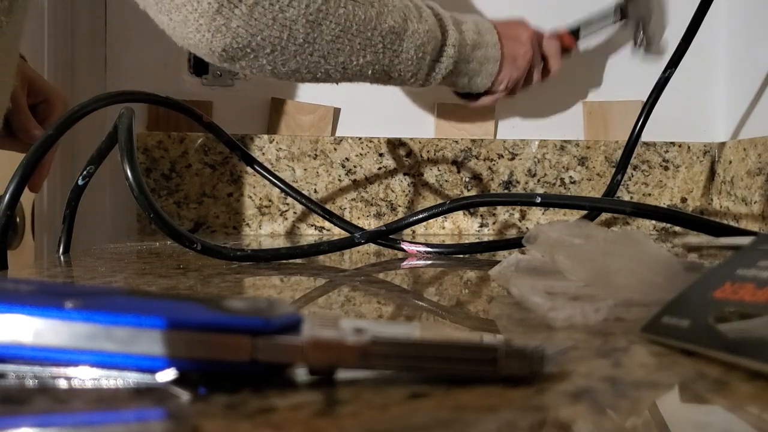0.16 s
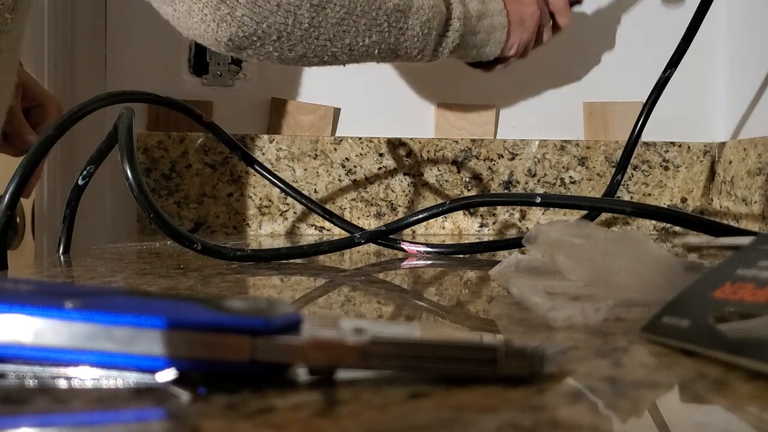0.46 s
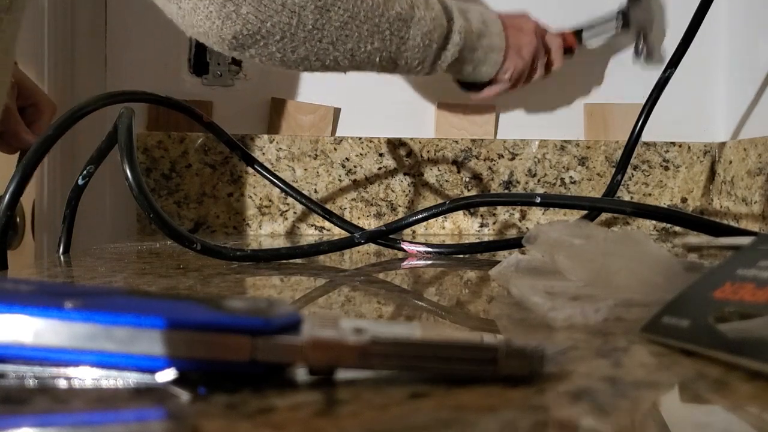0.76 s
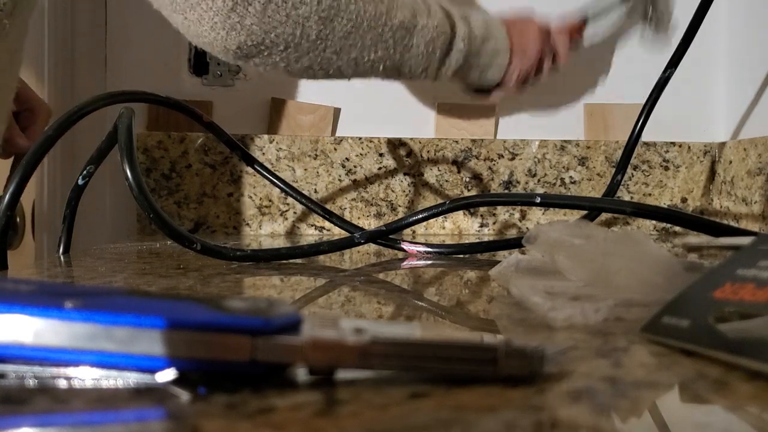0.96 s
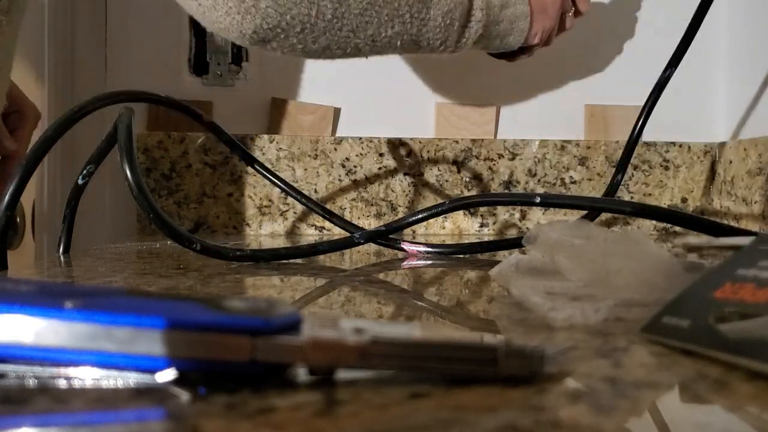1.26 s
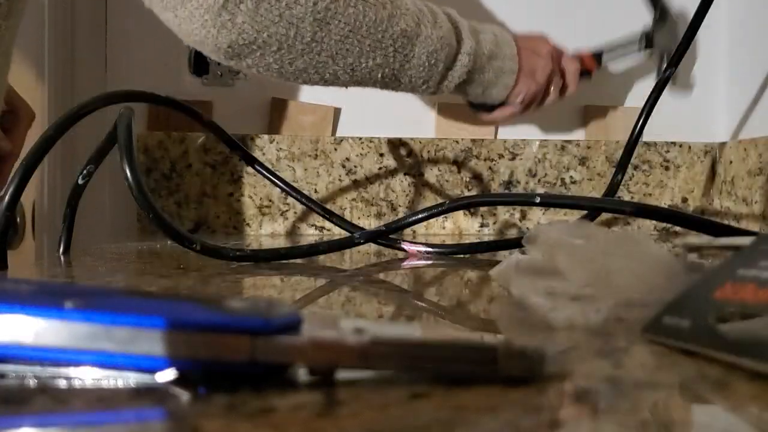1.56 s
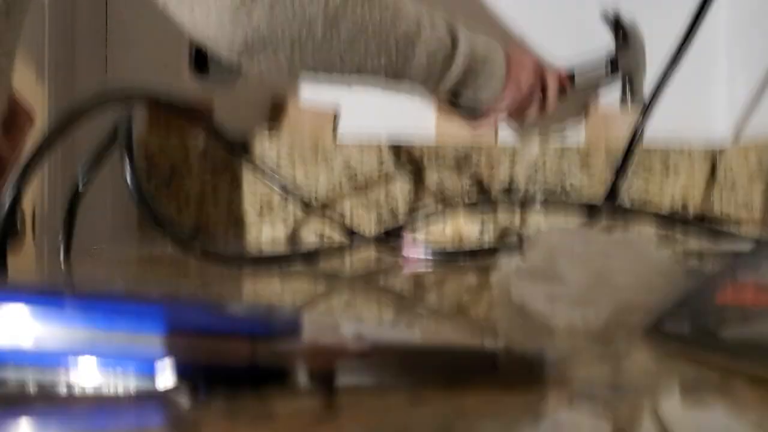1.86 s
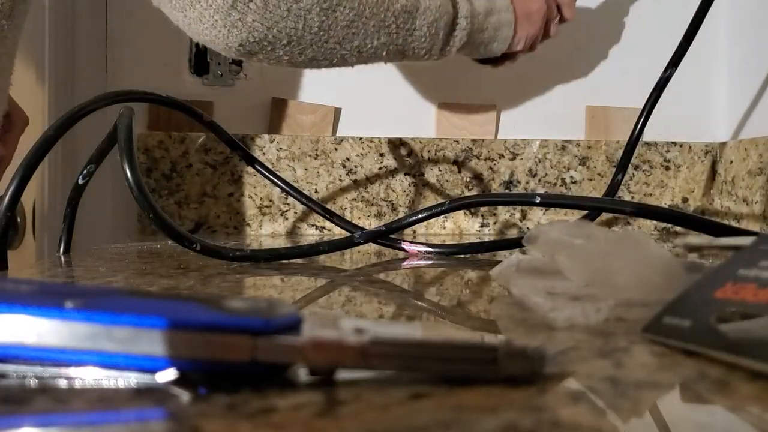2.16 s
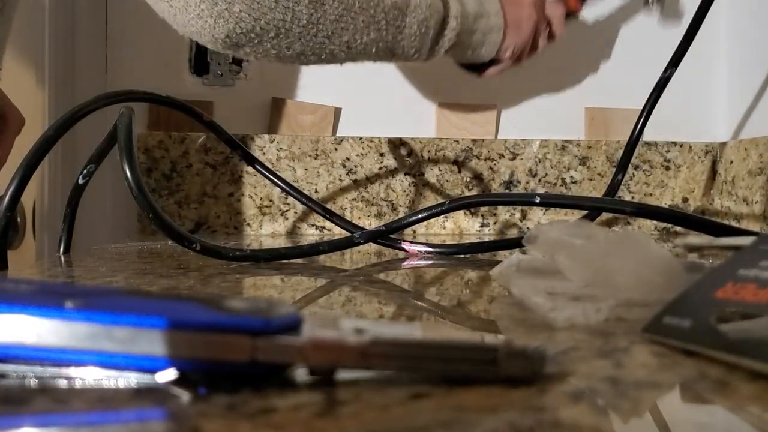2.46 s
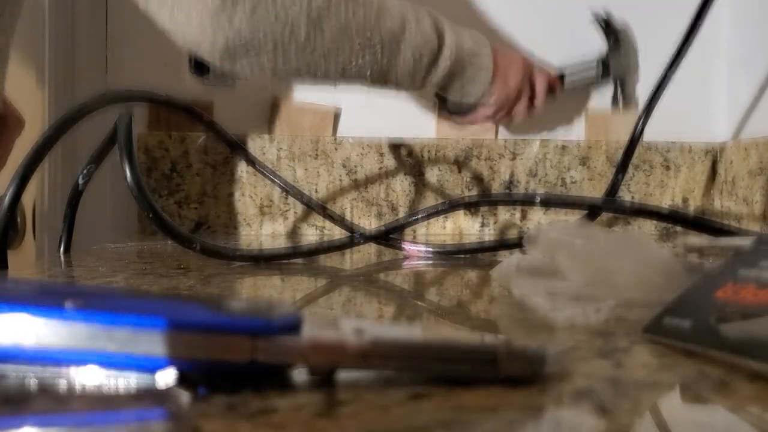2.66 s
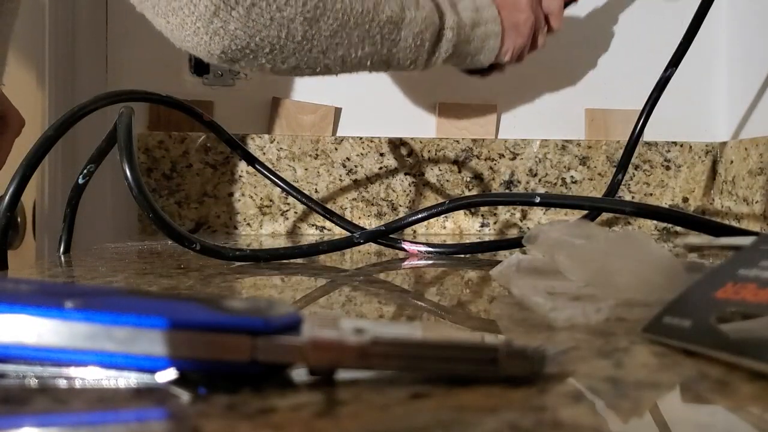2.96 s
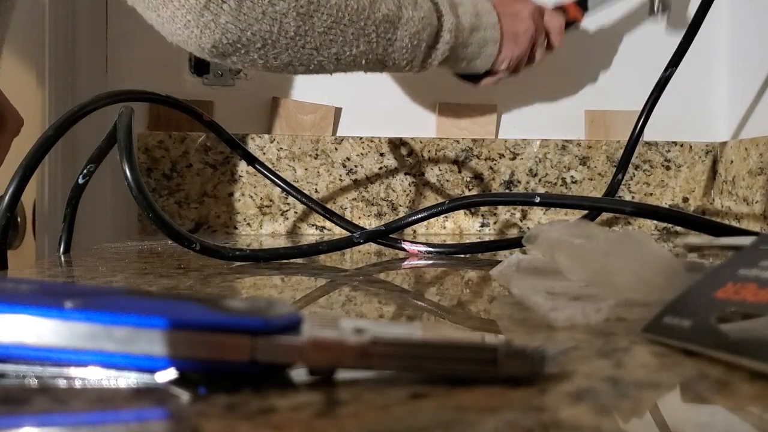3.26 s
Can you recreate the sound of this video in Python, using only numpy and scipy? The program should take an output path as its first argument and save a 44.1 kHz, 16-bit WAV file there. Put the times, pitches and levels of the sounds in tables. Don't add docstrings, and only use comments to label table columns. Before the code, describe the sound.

A hammer drives a wooden wedge behind a stone slab: a previous blow's ring fades, then eight sharp knocks follow steadily, heard close by a phone on the counter in a bare, hard room.

```python
import sys
import numpy as np
from scipy import signal
from scipy.fft import rfft, irfft
from scipy.io import wavfile

SR = 44100
rng = np.random.default_rng(int(sys.argv[2]) if len(sys.argv) > 2 else 0)


def dump(signal):
    limited = np.clip(np.atleast_2d(signal).T, -1, 1)
    pcm = np.round(limited * 32767).astype(np.int16)
    wavfile.write(sys.argv[1], SR, pcm)


def invert_db(level):
    return 10 ** (np.asarray(level, dtype=float) / 20)


N = 149940
LEAD_S = 0.5
LEFT_DB = -1.26


def conv(x, y):
    return signal.fftconvolve(np.atleast_2d(x), np.atleast_2d(y), axes=1)[:, :x.shape[-1]]


def on_log(table, hz):
    points = np.array(table)
    return np.interp(np.log(hz), np.log(points[:, 0]), points[:, 1])


def die_away(t, t60):
    return np.exp(-np.log(1000) * t / t60)


def ring(modes, t):
    return -sum(invert_db(db) * np.sin(2 * np.pi * hz * t) * die_away(t, max(t60, 1e-3)) for hz, db, t60 in modes)


def late(x, s):
    n = x.shape[-1]
    turn = np.exp(-2j * np.pi * np.fft.rfftfreq(n, 1 / SR) * s)
    return irfft(rfft(x) * turn, n)


def band(x, hz, kind):
    return signal.sosfilt(signal.butter(2, hz, kind, fs=SR, output="sos"), x)


ZONE_EDGES = [1450, 4500, 10800]


def zone(hz):
    return int(np.searchsorted(ZONE_EDGES, hz))


# t/s, level/dB, then crack, steel and sizzle against that level/dB
BLOWS = [
    (-.137, 4, -16.5, -25.5, -46),
    (0.2588, -0.5, -15.5, -25, -49),
    (0.6594, -1, -14.5, -25, -47),
    (1.052, -1, -14.5, -30.5, -47),
    (1.44, 0.5, -18.5, -35, -45),
    (1.9033, 0, -15.5, -32, -43.5),
    (2.3178, -0.5, -15.5, -31, -35.5),
    (2.7117, 1.5, -18, -32, -43.5),
    (3.0996, 1.07, -17, -31, -46.5),
]
USUAL_ZONE_DB = np.array([0, -16, -31, -45])


def blows(size):
    push, cracks, ticks = np.zeros(size), np.zeros((2, size)), np.zeros((4, size))
    t = np.arange(1500) / SR
    for s, db, *bright_db in BLOWS:
        zone_db = np.append(0, bright_db) - USUAL_ZONE_DB
        at = int((s + LEAD_S) * SR)
        here = slice(at, at + len(t))
        push_s = 0.00008 * invert_db(0.5 * rng.standard_normal())
        shape = t * np.exp(-t / push_s)
        push[here] += invert_db(db) * shape / shape.sum()
        cracks[:, here] += invert_db(db) * (crack(zone_db, t) + steel(zone_db, t))
        ticks[:, at] += invert_db(db) * invert_db(zone_db)
    return push, cracks, ticks


# f/Hz, level/dB, t60/s
KNOCK = [(106, -20.5, 0.064), (185.6, -6, 0.048), (270, 3.5, 0.012), (518.5, -10, 0.014),
         (1107, 1.5, 0.015), (2887, -1, 0.056)]


def wood_knock(push):
    wall_echo_s, wall_echo_db, slab_low_hz = 0.0147, -15, 103
    rung = conv(push, ring(KNOCK, np.arange(SR) / SR))[0]
    knock = invert_db(-3.5) * band(rung, slab_low_hz, "high")
    return knock + invert_db(wall_echo_db) * late(knock, wall_echo_s)


# f/Hz, level/dB
CRACK = [(600, -4), (1200, -2.5), (2100, -3.5), (3600, -5), (5200, -13.5), (7000, -14.5), (10000, -19.5),
         (15000, -27)]


def crack(zone_db, t):
    t60_s, side_share, crack_db = 0.035, 0.74, 6.5
    out = 0
    for hz in 600 * 2 ** (np.arange(10) / 1.95):
        burst = rng.standard_normal((2, len(t))) * die_away(t, t60_s / (hz / 2000) ** 0.5)
        grit = band(burst, [hz / 1.176, hz * 1.1], "band")
        mid, side = grit / np.sqrt(np.sum(grit ** 2, axis=1, keepdims=True))
        pair = mid + side_share * side * np.array([[1], [-1]])
        out = out + invert_db(on_log(CRACK, hz) + zone_db[zone(hz)]) * pair
    return invert_db(crack_db) * out


# f/Hz, level/dB, t60/s
STEEL = [(4370, -15, .03), (6790, -28, 0.016)]


def steel(zone_db, t):
    return invert_db(zone_db[2]) * ring(STEEL, t)


# f/Hz, level/dB, t60/s
BODY = [(45.4, -7, 0.79), (92.4, -17, 1), (104.3, -1.5, 0.64), (136, 12.5, 0.18), (181.6, -26, 0.75),
        (240.2, 6, 0.24), (270.2, 0, 0.38), (379.2, 3, 0.22), (393.9, 6, 0.23), (542, -7, 1),
        (643.5, -1.5, 0.26), (886, 10, 0.12), (1028, 5.5, 0.15), (1146, -7, 0.6)]


def bodies(push):
    swell_s, body_db = 0.017, -22
    t = np.arange(SR) / SR
    return invert_db(body_db) * conv(push, ring(BODY, t) * (1 - np.exp(-t / swell_s)))[0]


def through_stone(push):
    lead_s, stone_db, stone_hz = 0.0013, -18, 700
    thud = conv(push, ring([(stone_hz, 0, 0.015)], np.arange(SR) / SR))[0]
    return invert_db(stone_db) * late(thud, -lead_s)


def bounce_tap(size):
    tap = np.zeros(size)
    tap[int((1.5270 + LEAD_S) * SR)] = 1
    return band(tap, 2700, "low")


# f/Hz, level/dB, t60/s
BOUNCE_RING = [(760, -11, 0.023), (1290, -28, 0.01), (1820, -15.5, .015), (2920, -19, .012)]


def bounce_knock(tap):
    return -conv(tap, ring(BOUNCE_RING, np.arange(SR) / SR))


# f/Hz, level/dB per Hz
ROOM = [(60, -34), (110, -5), (300, -4.5), (520, -5.5), (1100, -11.5), (2700, -14.5), (4200, -23),
        (15000, -53)]
# f/Hz, t60/s
ROOM_T60 = [(60, 0.27), (200, 0.69), (500, 0.99), (1200, 1), (3000, 1.), (7000, 0.71), (14000, 0.29)]
# f/Hz, correlation (1 = same)
LIKENESS = [(100, 0.71), (300, 0.87), (600, 0.31), (1500, -0.14), (3000, -0.038), (8000, .05)]


def room(t):
    room_db, rise_s = -30, 0.006
    out = np.zeros((4, 2, len(t)))
    for hz in 63 * 2 ** (np.arange(25) / 3):
        edges = [hz / 1.122, min(hz * 1.122, 0.45 * SR)]
        mid, side = band(rng.standard_normal((2, len(t))), edges, "band")
        like = np.clip(on_log(LIKENESS, hz), -1, 1)
        pair = np.sqrt(1 + like) * mid + np.sqrt(1 - like) * side * np.array([[1], [-1]])
        fade = die_away(t - 0.15, on_log(ROOM_T60, hz))
        out[zone(hz)] += invert_db(on_log(ROOM, hz)) * pair * fade
    return invert_db(room_db + 19) * out * (1 - np.exp(-t / rise_s))


ROOM_ZONE_DB = [-1.5, -0.5, -4.5, -13]


def room_answer(ticks, tap):
    bounce_room_db = -11.5
    drive = ticks * invert_db(ROOM_ZONE_DB)[:, None]
    drive = drive + invert_db(bounce_room_db) * tap * np.array([[1], [1], [0], [0]])
    responses = room(np.arange(SR) / SR)
    wet = sum(conv(np.array([d, d]), r) for d, r in zip(drive, responses))
    return wet * invert_db(np.array([[LEFT_DB / 2], [0]]))


def floor(size):
    noise = rng.standard_normal((5, size))
    tone = invert_db(-73) * band(noise[:2], [200, 2500], "band")
    hiss = invert_db(-82) * band(noise[2:4], 9000, "high")
    rumble = invert_db(-62 + 39) * band(noise[4], [38, 70], "band")
    return tone + hiss + rumble


def scene():
    left_top_hz, left_lag_s = 13030, 0.00011
    size = N + int(LEAD_S * SR)
    push, cracks, ticks = blows(size)
    tap = bounce_tap(size)
    left, right = wood_knock(push) + through_stone(push) + bodies(push) + cracks
    left = invert_db(LEFT_DB) * late(band(left, left_top_hz, "low"), left_lag_s)
    near = np.array([left, right]) + bounce_knock(tap)
    return (near + room_answer(ticks, tap) + floor(size))[:, -N:]


def band_limit(x):
    return signal.sosfilt(signal.butter(12, 16710, fs=SR, output="sos"), x)


def record(dry):
    dip_hz, dip_width_hz, dip_depth = 8090, 870, 0.55
    low_hz, top_hz, limit = 72.4, 15600, 0.7
    peak = signal.lfilter(*signal.iirpeak(dip_hz, dip_hz / dip_width_hz, fs=SR), dry)
    no_bass = band(dry - dip_depth * peak, low_hz, "high")
    heard = signal.sosfilt(signal.ellip(6, 0.3, 40, top_hz, fs=SR, output="sos"), no_bass)
    return band_limit(np.tanh(limit * heard) / limit)


dry = scene()
out = record(dry)
dump(out)
```